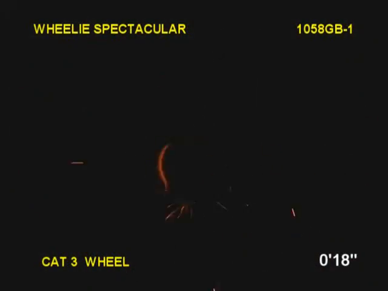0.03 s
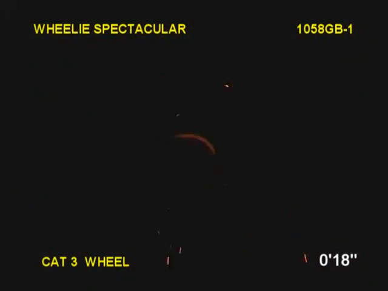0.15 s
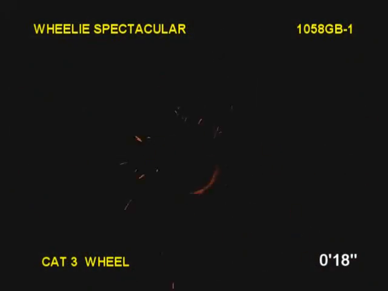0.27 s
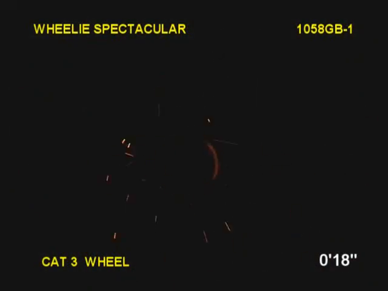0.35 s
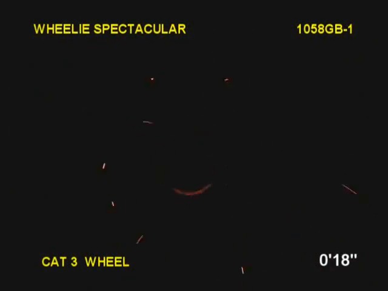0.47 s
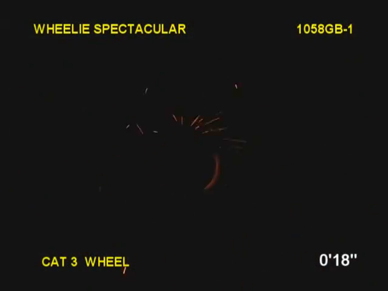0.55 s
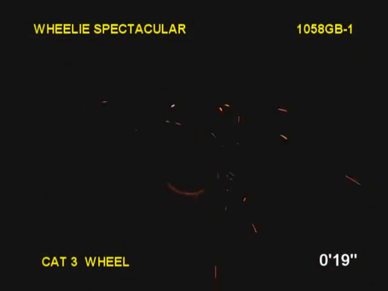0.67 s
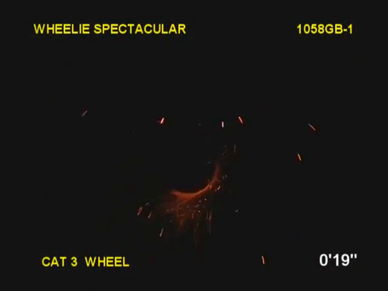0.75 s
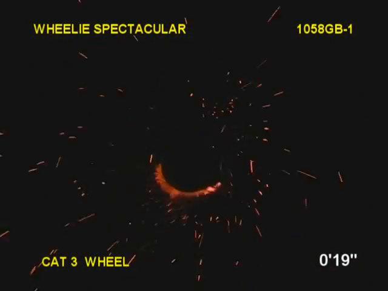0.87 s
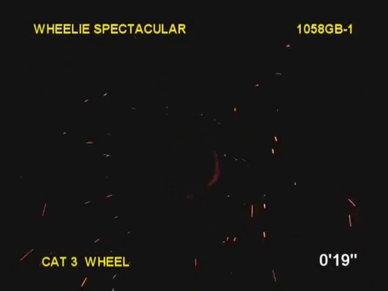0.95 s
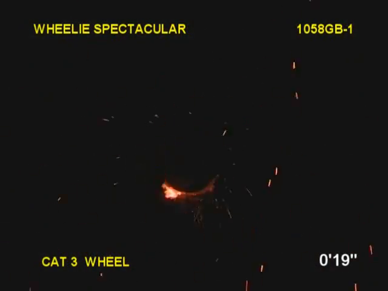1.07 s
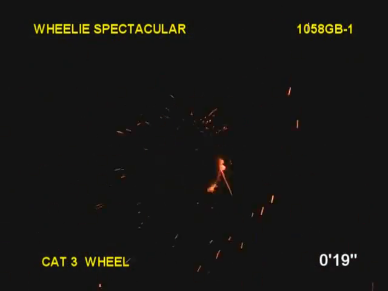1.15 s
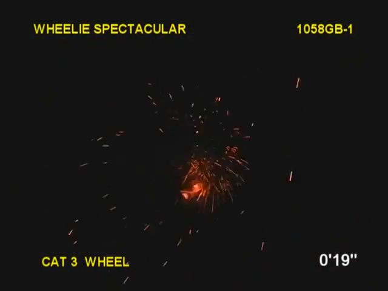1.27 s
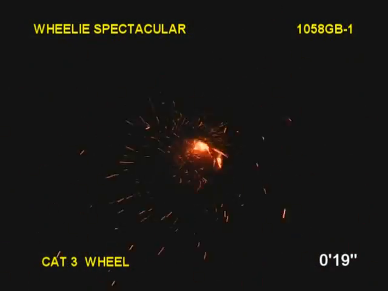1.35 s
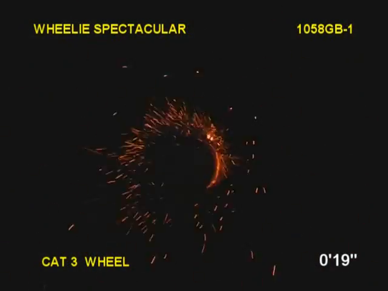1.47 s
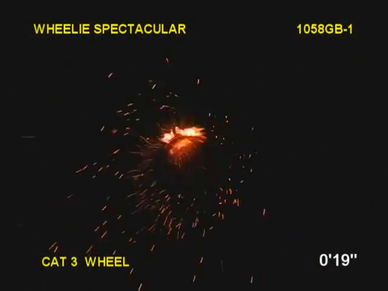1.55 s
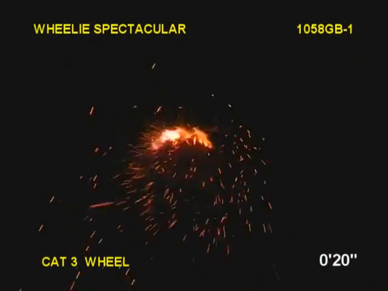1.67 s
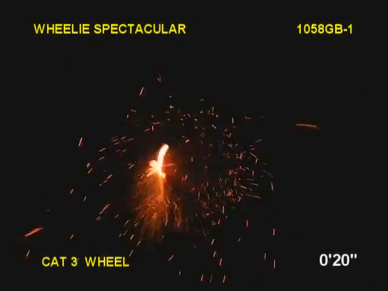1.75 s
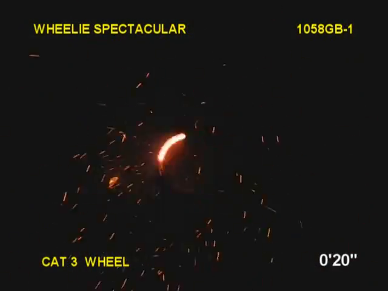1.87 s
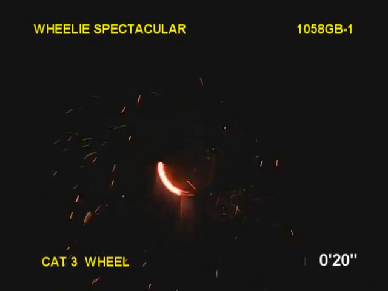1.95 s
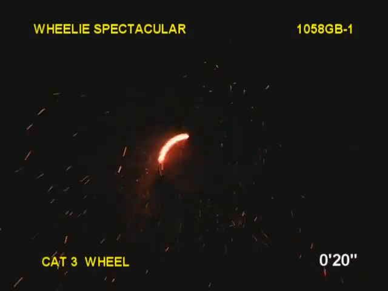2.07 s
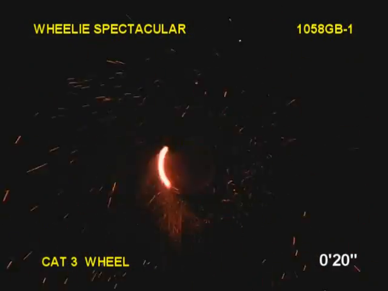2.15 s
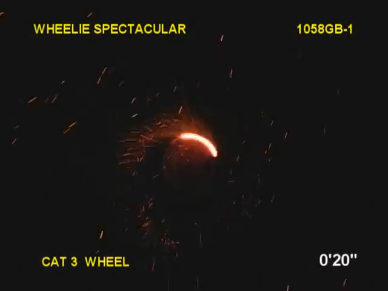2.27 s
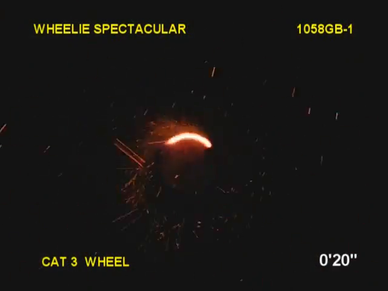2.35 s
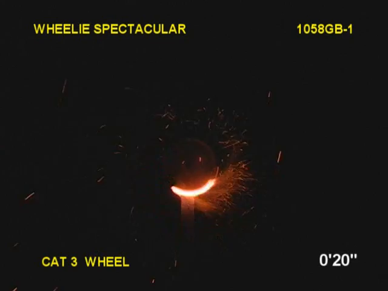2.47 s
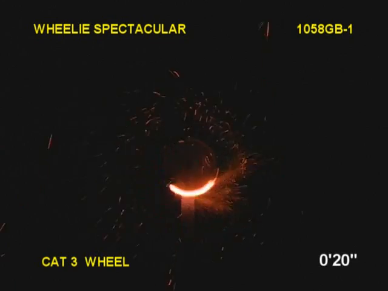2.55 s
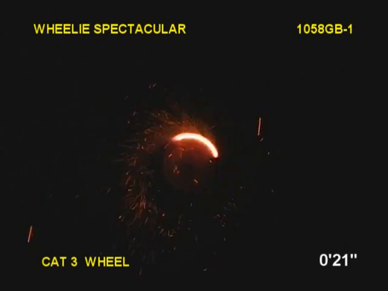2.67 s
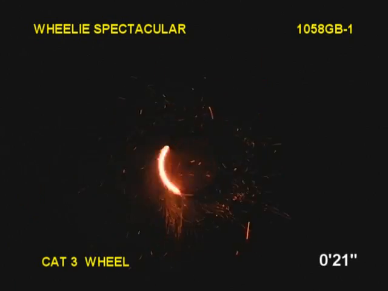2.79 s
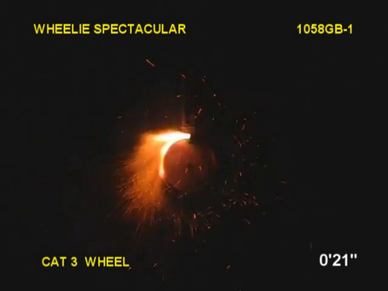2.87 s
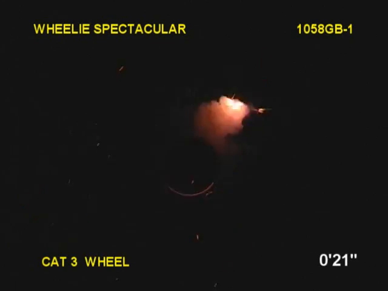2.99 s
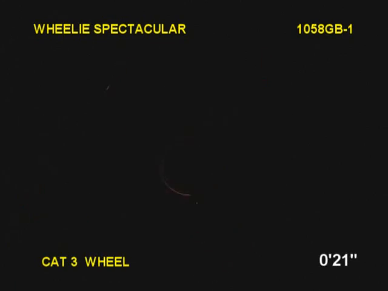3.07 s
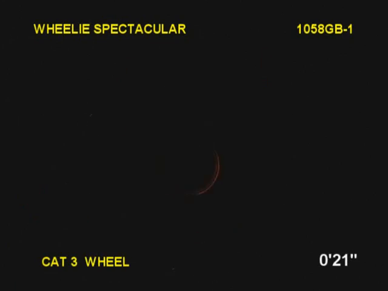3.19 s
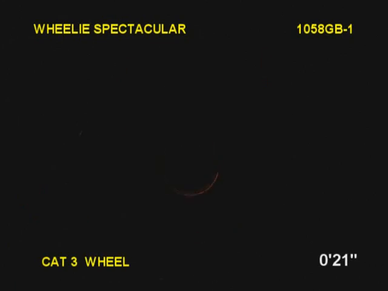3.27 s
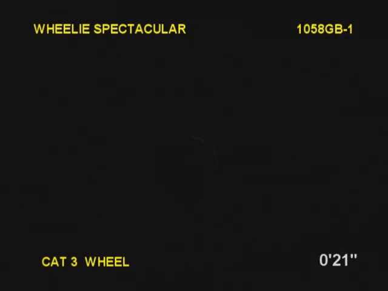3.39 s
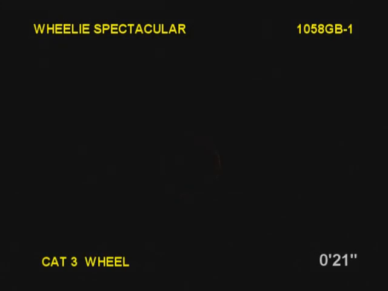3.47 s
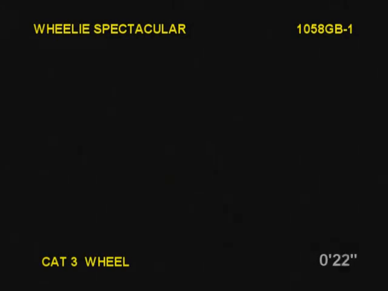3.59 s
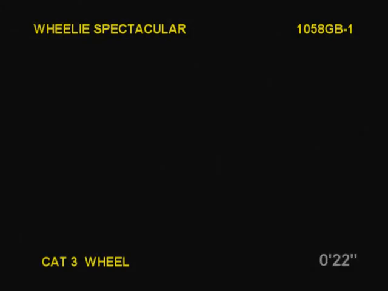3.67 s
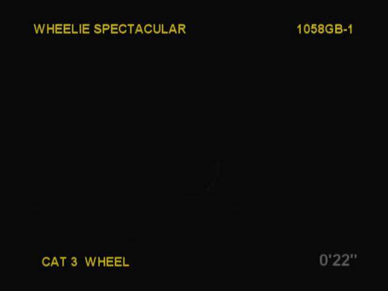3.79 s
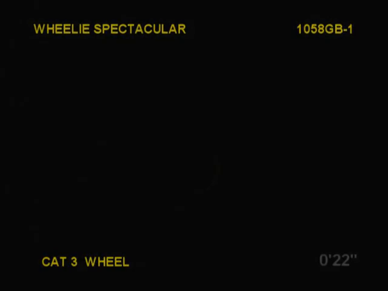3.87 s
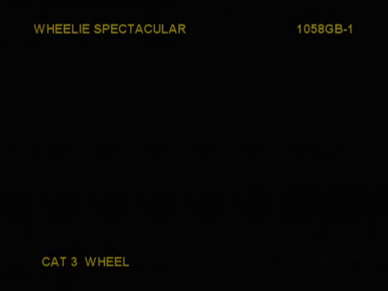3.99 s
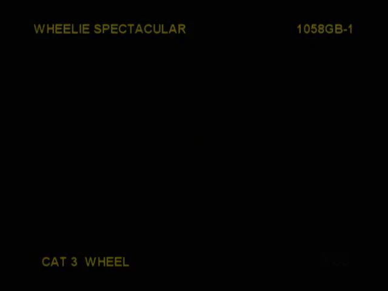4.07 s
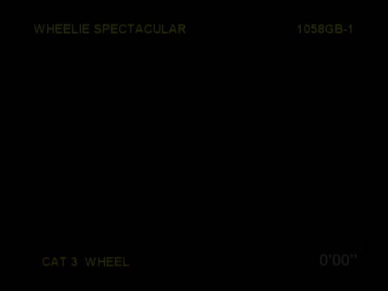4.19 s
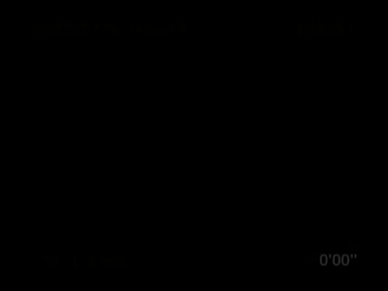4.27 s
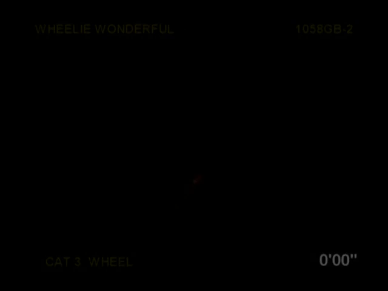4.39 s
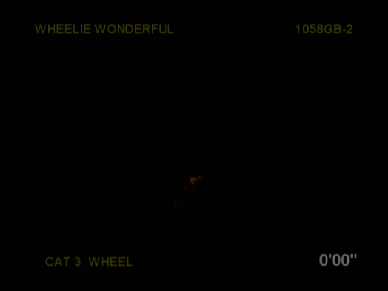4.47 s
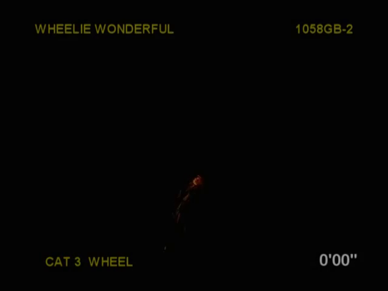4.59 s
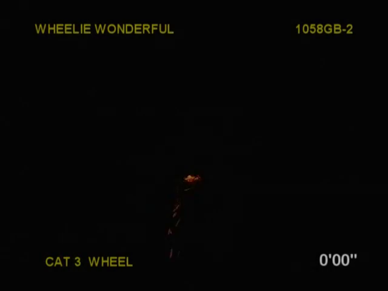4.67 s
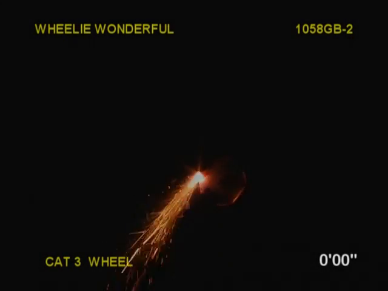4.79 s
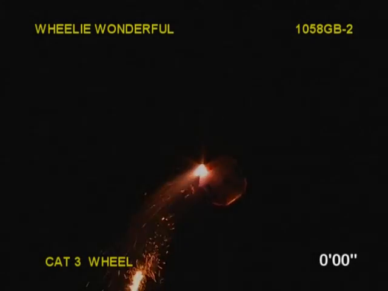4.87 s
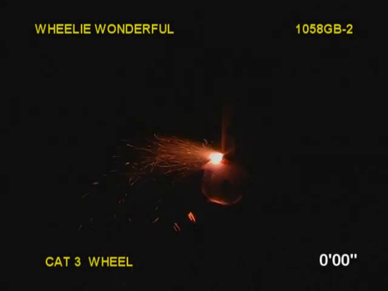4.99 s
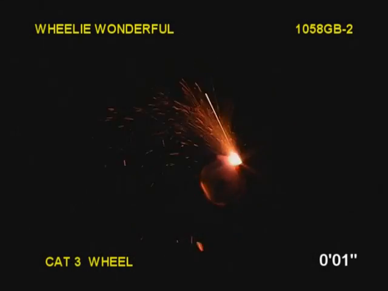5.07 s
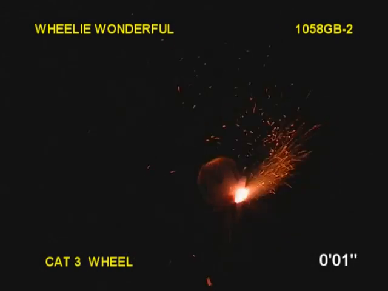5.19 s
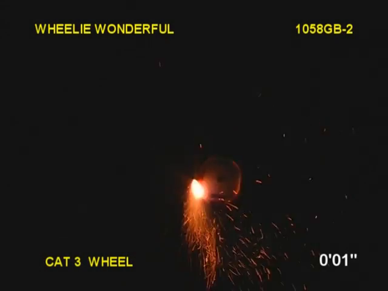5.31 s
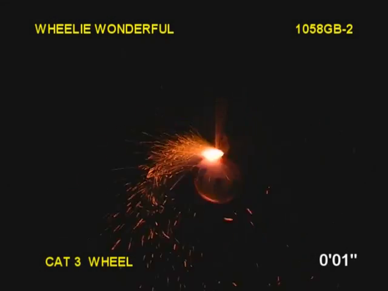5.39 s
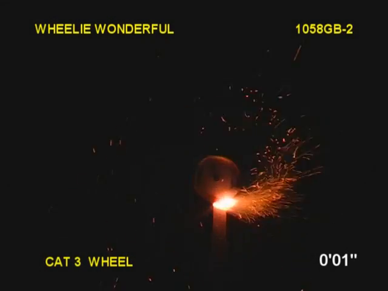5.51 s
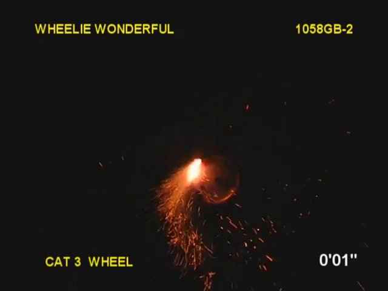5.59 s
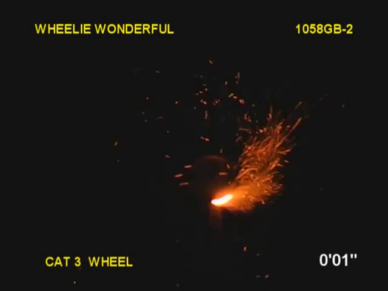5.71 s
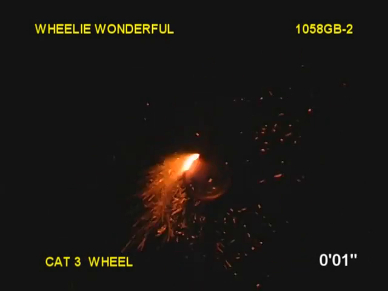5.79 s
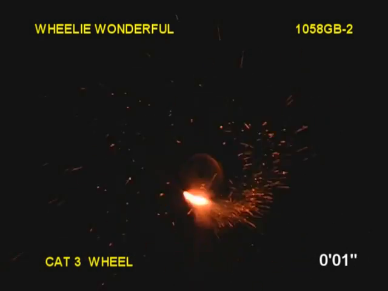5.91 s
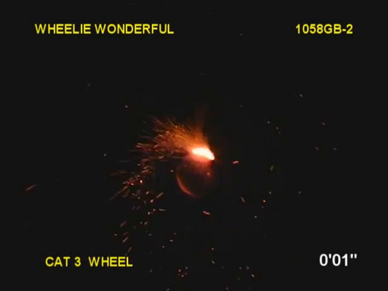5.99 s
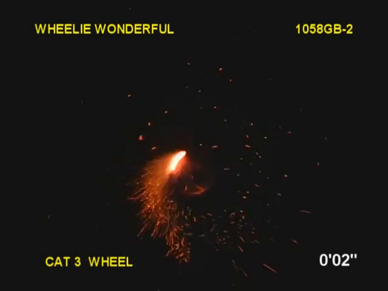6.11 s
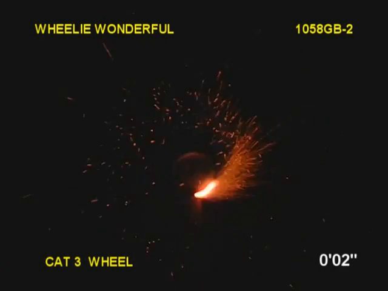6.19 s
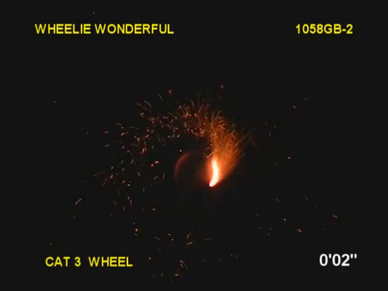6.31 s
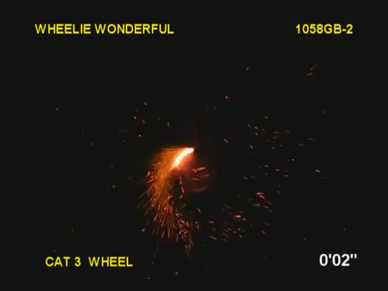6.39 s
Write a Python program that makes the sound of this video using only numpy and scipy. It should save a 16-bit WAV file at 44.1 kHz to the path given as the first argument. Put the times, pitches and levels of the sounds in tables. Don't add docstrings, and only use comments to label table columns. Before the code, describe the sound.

A night field with distant traffic wash, low rumble and a wavering engine drone, strongest around 1.3 seconds. From about 0.75 to 1.75 a coasting firework wheel gives faint, airy puffs of hiss roughly ten times a second. At 1.8 it bursts into a loud, piercing whistle, buzzy and fluttering with the rapid spin, sliding downward with small sputters while the background is pushed down. At 2.95 it cuts off with a short dull thud; echoes from posts, a far wall and trees ring away. Sound fades from 3.75 to near silence around 4.35, then the background returns. At 4.7 a second wheel fizzes alight and at 4.8 screams at a higher pitch, falling steadily and sweeping toward the farther microphone in slow swells. It chokes near 5.75, relights lower and rougher, and is still whistling at the end, about 6.4.

```python
import sys
import numpy as np
from scipy import signal
from scipy.fft import rfft, irfft, next_fast_len
from scipy.io import wavfile
from scipy.ndimage import uniform_filter1d

SR = 44100
rng = np.random.default_rng(int(sys.argv[2]) if len(sys.argv) > 2 else 0)


def attenuation_scalar(level_db):
    decades = np.asarray(level_db, float) / 20
    return 10 ** decades


def dump_mix(stems):
    frames = np.atleast_2d(stems).T
    limited = np.clip(frames, -1, 1)
    pcm = np.round(limited * 32767).astype(np.int16)
    wavfile.write(sys.argv[1], SR, pcm)


N = 284445
T = np.arange(N) / SR
THUD_S, CUT_S = 2.951, 4.36

# (whistle on [s], rise [s], odd partials on [s], flame on [s], burn-out [s])
WHEELS = [
    (1.811, .004, 1.83, 1.8118, 2.9487),
    (4.778, 0.033, 4.81, 4.71, 6.6),
]


def evened(x):
    return x / np.sqrt(np.mean(abs(x) ** 2) + 1e-20)


def read(points, hz):
    f, value = np.transpose(points)
    return np.interp(np.log(hz + 1), np.log(f + 1), value)


def drift(rate_hz, channels=1):
    step = int(SR / rate_hz / 2) + 1
    points = rng.standard_normal((channels, N // step + 2))
    lines = [np.interp(np.arange(N) / step, np.arange(len(p)), p) for p in points]
    return evened(uniform_filter1d(lines, step))


def noise(spectrum, patchy_db):
    frames, hz = N // 256 + 5, np.fft.rfftfreq(1024, 1 / SR)
    a, b, patches = rng.standard_normal((3, 2, 513, frames), dtype=np.float32)
    patches = uniform_filter1d(patches, size=10, axis=1)
    patches = evened(uniform_filter1d(patches, size=8, axis=2))
    z = (a + 1j * b) * attenuation_scalar(read(spectrum, hz)[:, None] + patchy_db * patches)
    return evened(signal.istft(z, nperseg=1024, noverlap=768)[1][:, :N])


def colour(x, db_of_hz):
    size = next_fast_len(N)
    gain = attenuation_scalar(db_of_hz(np.fft.rfftfreq(size, 1 / SR)))
    return irfft(rfft(x, size) * gain, size)[:, :N]


def gate(on, off, rise, fall):
    return np.clip((T - on) / rise, 0, 1) * np.clip((off - T) / fall, 0, 1)


def bumps(rows):
    return sum(height * np.exp(-((T - s) / width) ** 2) for s, height, width in rows)


def later(x, s):
    return np.concatenate([np.zeros(round(s * SR)), x])[:N]


def burn():
    # (time [s], pitch of partial 1 [Hz], partial 2 at near mic [dB], alternate-pulse
    # unevenness [dB])
    first_burn = [(1.825, 2055, -14, -8.5), (1.863, 2114, -12, -5.5), (2.1, 2032, -15.5, -5),
                  (2.499, 1932, -16.5, -4), (2.6, 1867, -16, -7.5), (2.88, 1768, -16, -12),
                  (2.943, 1709, -21, -15)]
    second_burn = [(4.79, 2750, -24, -9), (4.828, 2848, -15, 0.5), (4.89, 2891, -15.5, -4),
                   (5.02, 2758, -19, 1), (5.171, 2657, -28.5, 9.5), (5.39, 2511, -15.5, 0.5),
                   (5.53, 2439, -24, 3), (5.673, 2358, -14, -6.5), (5.73, 2292, -22, 5.5),
                   (5.78, 2196, -18, -12), (5.815, 2187, -21, -8), (5.851, 2260, -17, -6.5),
                  (6.002, 2211, -20.5, -9.5), (6.18, 2118, -20.5, -5), (6.3, 2040, -18.5, -10.5),
                  (6.39, 1996, -22, -11), (6.45, 2000, -23.5, -7.5)]
    # (time [s], level change [dB], half width [s])
    sputters = [(1.96, -4, 0.015), (2.608, 0, 0.013), (2.76, -6, .01), (5.12, -3.5, 0.023),
                (5.59, -15, 0.012)]
    # (time [s], length [s], pitch drop [share])
    chokes = [
        (5.748, .016, 0.11),
        (2.938, .012, .02),
    ]
    s, *columns = np.transpose(first_burn + second_burn)
    hz, level_db, odd_db = (np.interp(T, s, column) for column in columns)
    for at, length, drop in chokes:
        u = (T - at) / length
        hz = hz * (1 - drop * (u > 0) * np.clip(1 - u, 0, 1) ** .4)
    return hz, level_db + bumps(sputters), odd_db


def spin():
    # (time of a pass [s], rate then [turns/s], gain [turns/s2])
    thrust = (2.062, 10.06, 4.92)
    pass_s, rate_hz, gain = thrust
    u = T - pass_s
    return np.cos(2 * np.pi * u * (rate_hz + gain * u / 2)) * (T < 4)


def hiss_and_aim():
    # (from [s], hiss [dB], hiss drift [dB/s], far minus near mic [dB], its drift [dB/s])
    courses = [
        (1.83, -59.5, -2.5, -12, 11),
        (4.83, -46, -12.5, -15, -2),
    ]
    # (time [s], gain there [dB], half width [s])
    sweeps = [(5.19, 27.5, 0.13), (5.52, 21.5, .07), (5.7, 12, 0.036), (5.82, 8.5, .03), (6.07, 10, 0.051),
              (6.18, 15, 0.034), (6.33, 19.5, 0.032)]
    start, hiss_db, hiss_slope, far_db, far_slope = (np.where(T < CUT_S, a, b) for a, b in zip(*courses))
    u = T - start
    return hiss_db + hiss_slope * u, far_db + far_slope * u + bumps(sweeps)


def jet_flame(hiss_db, turn):
    # (frequency [Hz], level [dB])
    fast_jet = [(300, -21), (1000, -18), (2000, -6.5), (3000, -3.5), (4200, 3), (5500, -4), (8000, -5.5),
                (11000, -1), (13000, -6.5), (16000, -14.5)]
    slow_jet = [(300, -31), (900, -25.5), (1300, -16.5), (2000, -15), (3000, -5), (4200, 1), (7000, -1.5),
                (9000, -8.5), (12000, -7.5), (16000, -32)]
    fizz = sum(gate(flame, off, on - flame + 2 * rise, .002) ** 3.1 for on, rise, _, flame, off in WHEELS)
    hiss = np.where(T < 4, noise(fast_jet, 0.86) * attenuation_scalar(6.5 - 2.5 * turn), noise(slow_jet, 3.1))
    return hiss * attenuation_scalar(hiss_db + 16.0 + 2.0 * drift(150)) * fizz


def whistle(far_db, turn, rough, flutter_db, jitter):
    partials_db = [
        [0, 2, 9.1, -8.5, 7.8, -14, -19.5, -44],
        [7, 2, 8.2, -11.5, 6.8, -11.5, -2, -21],
    ]
    doppler = [.014, -.003]
    beam_swing_db = [-3.5, 3.5]
    hz, level_db, odd_db = burn()
    hz = hz * (1 + jitter * drift(60)[0])
    lit = sum(gate(on, off, rise, .0007) for on, rise, _, _, off in WHEELS)
    odd_lit = sum(gate(on, off, 0.0032, .0007) for _, _, on, _, off in WHEELS)
    heard_hz = hz * (1 + np.outer(doppler, turn * gate(1.88, 4, .05, 0.095)))
    phase = 2 * np.pi * np.cumsum(heard_hz, axis=1) / SR
    spit, waver_db = 0.38 * drift(900, channels=2), 2.2 * drift(12, channels=2)
    far_only, swing_db = np.array([[0], [1]]), np.outer(beam_swing_db, turn)
    out = np.zeros((2, N))
    for k, db in enumerate(np.transpose(partials_db), 1):
        re, im = (drift(300, channels=2) + spit) * (k / 2) ** .4
        line = (1 + rough * re) * np.cos(k * phase) - rough * im * np.sin(k * phase)
        db = db[:, None] + level_db + flutter_db * drift(55, channels=2)
        if k == 1:
            db = db + waver_db
        if k % 2:
            db, on = db + odd_db - 20.5, odd_lit
        else:
            db, on = db + far_db * (far_only if k == 2 else .5) + swing_db, lit
        out += np.sqrt(2) * attenuation_scalar(db) * line * on * (k * hz < 18000)
    return out


def burning_wheels():
    # (frequency [Hz], gain [dB])
    paths = [
        [(1300, 3), (2000, -12.5), (2700, -1), (8000, 1), (11000, -0.5), (13000, -17.5), (16000, -31.5)],
        [(1300, 3.5), (2000, -8), (2700, -3.5), (8000, 0.5), (11000, -9.5), (13000, -9), (16000, -14)],
    ]
    turn = spin()
    hiss_db, far_db = hiss_and_aim()
    out = jet_flame(hiss_db, turn) + whistle(far_db, turn, rough=0.12, flutter_db=2.5, jitter=0.0022)
    return colour(out, lambda f: [read(path, f) for path in paths])


def puffs():
    # (time [s], level [dB], half width [s])
    passes = [(0.741, -85, .03), (.85, -56, 0.055), (.94, -65.5, 0.026), (1.07, -67, 0.036),
              (1.165, -65, 0.043), (1.27, -60.5, 0.045), (1.385, -62.5, .015), (1.49, -58.5, 0.024),
              (1.6, -62.5, 0.065), (1.715, -61, 0.034)]
    # (frequency [Hz], level [dB])
    puff_spectrum = [(1500, -19), (3000, 0.5), (4500, 1), (5600, -6), (7000, 4.5), (8800, -7.5),
                     (10500, -2.5), (12000, -11.5), (13000, -32)]
    level = bumps((s, attenuation_scalar(db), width) for s, db, width in passes)
    return noise(puff_spectrum, 2.0) * level * attenuation_scalar([[2], [-3]])


def thud():
    # (level [dB], frequency [Hz], t60 [s])
    blowout = (-37.5, 140.4, .08)
    db, hz, t60 = blowout
    u = np.maximum(T - THUD_S, 0)
    push = -np.sin(2 * np.pi * hz * u) * np.exp(-u / .006)
    push += 0.43 * drift(1500)[0] * np.exp(-u / 0.0092) * (u > 0)
    push += .15 * drift(400)[0] * attenuation_scalar(-60 * u / t60) * (u > 0)
    return attenuation_scalar(db) * push * attenuation_scalar([[0], [-2]])


def field(x):
    # (delay [s], level [dB])
    echoes = [
        [(.0021, -22.5), (.011, -21.5), (.031, -19), (.09, -26), (.14, -24.5), (.188, -26.5), (.197, -23),
         (.203, -27.5)],
        [(.0018, -27), (.009, -13), (.024, -13.5), (.08, -22), (.12, -17.5), (.141, -22), (.148, -17.5),
         (.153, -20)],
    ]
    # (frequency [Hz], t60 [s])
    tree_decay = [(500, 1.2), (2000, 1.6), (3500, 2.43), (5500, 2.2), (7000, 1.5), (11000, 0.69)]
    tree_level_db = [-36, -25.5]
    length = 2 * SR
    taps = np.zeros((2, length))
    at = np.arange(1500, length - 20, 20) + rng.integers(0, 20, (2, (length - 1501) // 20))
    np.put_along_axis(taps, at, rng.choice([-1., 1.], at.shape), 1)
    hz, t, z = signal.stft(taps, SR, nperseg=256)
    swell = np.clip(t / 0.1, .2, 1)
    z = z * swell * attenuation_scalar(-60 * t / read(tree_decay, hz)[:, None])
    tail = signal.istft(z, SR, nperseg=256)[1][:, :length]
    tail = tail / np.linalg.norm(tail, axis=1)[:, None] * attenuation_scalar(tree_level_db)[:, None]
    tail[:, 0] = 1
    for mic in range(2):
        for s, db in echoes[mic]:
            tail[mic, round(s * SR)] += attenuation_scalar(db)
    return signal.fftconvolve(x, tail, axes=1)[:, :N]


def duck():
    # (on [s], off [s], depth [dB], recovery [dB/s])
    ducks = [
        (1.82, 2.95, -14.5, 9.5),
        (4.8, 6.6, 0, -3.5),
    ]
    attack_s, release_s = 0.096, .03
    return sum(gate(on, off, attack_s, release_s) * np.minimum(db + back * (T - on), 0)
               for on, off, db, back in ducks)


def road(wash_db, tyres_db):
    # (frequency [Hz], level [dB per Hz])
    traffic_spectrum = [(15, -45), (60, -18), (100, -12), (175, -7.5), (360, -12.5), (550, -18), (740, -17),
                        (1640, -21), (3500, -34), (7000, -37.5), (12000, -40), (15600, -81.5)]
    # (frequency [Hz], left minus right [dB])
    traffic_side = [(60, -1.5), (240, -1), (950, -2.5), (3770, -2.5), (15000, -5)]
    # (level [dB], drift [dB/s])
    flame_roar = (-65, -8)
    on, off = WHEELS[1][0], WHEELS[1][4]
    roar = attenuation_scalar(flame_roar[0] + flame_roar[1] * (T - on) + 10.5) * gate(on, off, 0.078, .01)
    traffic = colour(noise(traffic_spectrum, 2.1), lambda f: np.outer([.5, -.5], read(traffic_side, f)))
    wash = colour(traffic, lambda f: -80 * (f > 430))
    return wash * attenuation_scalar(wash_db + 7.0) + (traffic - wash) * (attenuation_scalar(tyres_db + 10.5) + roar)


def low_rumble(rumble_db):
    # (frequency [Hz], level [dB per Hz])
    rumble_spectrum = [(15, -25.5), (30, -7), (45, -4), (60, -0.5), (90, -21.5), (200, -59)]
    x = colour(rng.standard_normal((2, N)), lambda f: read(rumble_spectrum, f))
    return evened(x) * attenuation_scalar(rumble_db + [[0], [3.5]])


def engine_drone(duck_db):
    # (time [s], pitch [Hz], level [dB])
    engine = [(0, 86.4, -63.5), (.4, 81.5, -62), (1.3, 81, -56.5), (1.7, 83.2, -61.5), (3.0, 86, -70),
              (4.3, 90, -73), (4.399, 99, -63.5), (4.8, 99.3, -69), (4.899, 99.1, -75), (6.45, 97.2, -79)]
    s, hz, db = np.transpose(engine)
    phase = 2 * np.pi * np.cumsum(np.interp(T, s, hz) * (1 + 0.032 * drift(5)[0])) / SR
    drone_db = np.interp(T, s, db) + 1.4 * duck_db + 1.9 * drift(14, channels=2)
    return np.sin(phase + [[0], [1.3]]) * attenuation_scalar(drone_db) * attenuation_scalar([[3], [7]]) * np.where(T > 4.85, .4, 1)


def night():
    # (first shot [dB], drift after burn-out [dB/s], second shot [dB], ducking [share])
    layers = [
        (-64.5, -2, -67.5, 1.05),
        (-67, 3.5, -71.5, .9),
        (-69, -6.5, -72.5, .25),
    ]
    duck_db = duck()
    since_thud = np.maximum(T - THUD_S, 0)
    wash_db, rumble_db, tyres_db = (np.where(T < CUT_S, a + slope * since_thud, b) + share * duck_db
                                    for a, slope, b, share in layers)
    return (road(wash_db, tyres_db) + low_rumble(rumble_db) + engine_drone(duck_db)) * fade()


def electronic_whine():
    # (frequency [Hz], level [dB])
    whine_tone = (11990, -85.5)
    hz, db = whine_tone
    return attenuation_scalar(db + 3.0 * drift(30)) * np.sin(2 * np.pi * hz * T) * [[.3], [1]]


def fade():
    fade_out_s, fade_in_s = 0.62, 0.76
    return np.clip(np.maximum((CUT_S - T) / fade_out_s, (T - CUT_S) / fade_in_s), .003, 1)


def limited(x, knee_db, share):
    power_db = 10 * np.log10(abs(uniform_filter1d(x ** 2, 300)) + 1e-12)
    return x * attenuation_scalar(-share * uniform_filter1d(np.maximum(power_db - knee_db, 0), 200))


def hum_filtered(x):
    notch_hz = 300
    size = next_fast_len(N + SR)
    hz = np.fft.rfftfreq(size, 1 / SR)
    lap = np.exp(-2j * np.pi * hz / notch_hz)
    notch = (1 - .93 * lap) / (1 - .72 * lap)
    notch = np.where(hz < notch_hz / 2, notch[np.argmin(abs(hz - notch_hz / 2))], notch)
    notch = notch * (1 - 0.64 * np.exp(-((hz - notch_hz / 2) / 12) ** 2))
    return irfft(rfft(x, size) * notch, size)[:, :N]


def masked(x, margin_db, spread_db):
    # (frequency [Hz], lowest level kept [dB])
    hearing = [(9000, -110), (12100, -100), (12500, -70.5), (15000, -63), (15400, -55.5), (16000, -40)]
    hz, t, z = signal.stft(x, SR, nperseg=1024)
    bands = z[:, :512].reshape(2, 32, 16, -1)
    level_db = 10 * np.log10(uniform_filter1d((abs(bands) ** 2).sum(2), size=3) + 1e-14)
    apart = np.arange(32)[:, None] - np.arange(32)
    apart = np.where(apart < 0, -4.0 * apart, apart)
    mask_db = (level_db[:, None] - spread_db * apart[None, :, :, None]).max(2) - margin_db
    floor_db = read(hearing, hz[8:512:16])[:, None]
    kept = level_db > np.maximum(mask_db, floor_db)
    z[:, :512] = (bands * kept[:, :, None]).reshape(2, 512, -1)
    return signal.istft(z, SR, nperseg=1024)[1][:, :N]


def scene():
    far_lag_s, first_shot_db = .0094, -7
    release_db = 3.5
    near, far = burning_wheels() + puffs() + thud()
    wheels = field(np.array([near, later(far, far_lag_s)]))
    wheels = wheels * ((T < CUT_S) | (T > WHEELS[1][3]))
    gain_db = first_shot_db * (T < CUT_S) + release_db * gate(THUD_S, CUT_S, .04, .01)
    return (wheels + electronic_whine()) * fade() * attenuation_scalar(gain_db) + night()


def roll_off(x):
    return signal.sosfilt(signal.butter(12, 15960, fs=SR, output="sos"), x)


def record(dry):
    clean = hum_filtered(limited(dry, knee_db=-15.5, share=0.9))
    mix = masked(clean, margin_db=27.5, spread_db=2.5)
    return roll_off(mix)


dry = scene()
out = record(dry)
dump_mix(out)
```